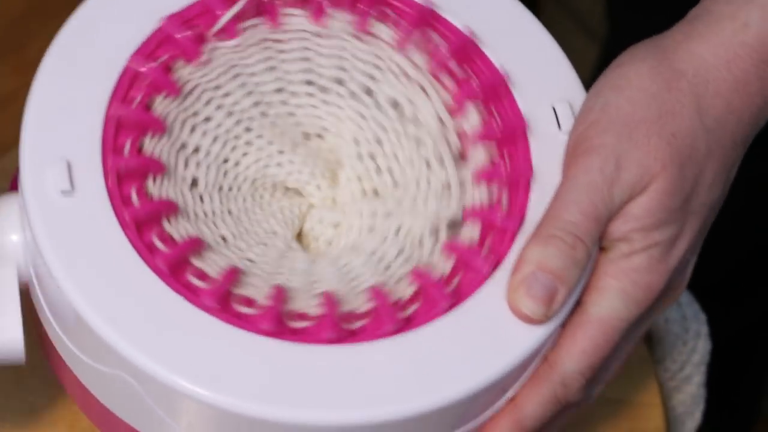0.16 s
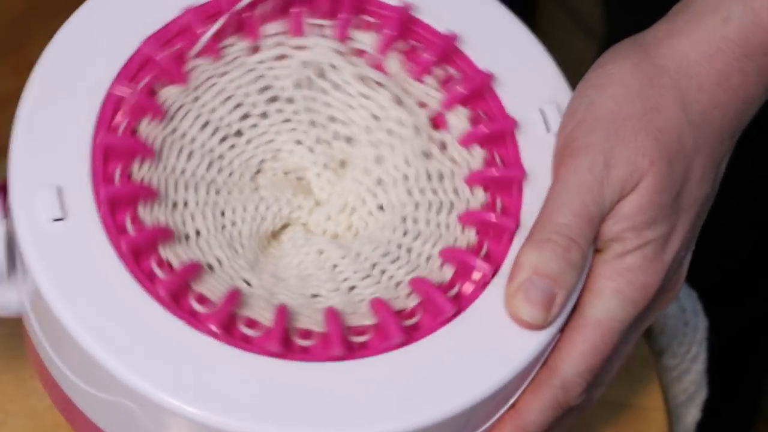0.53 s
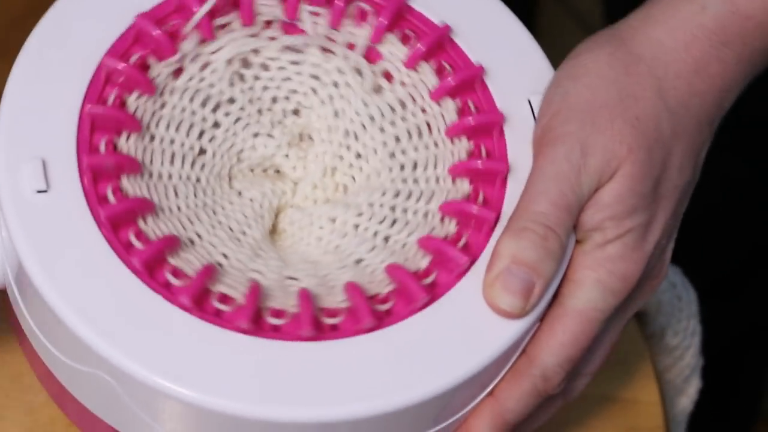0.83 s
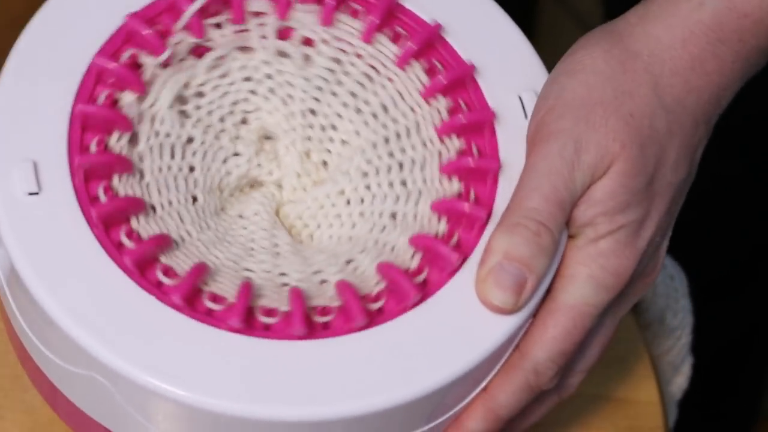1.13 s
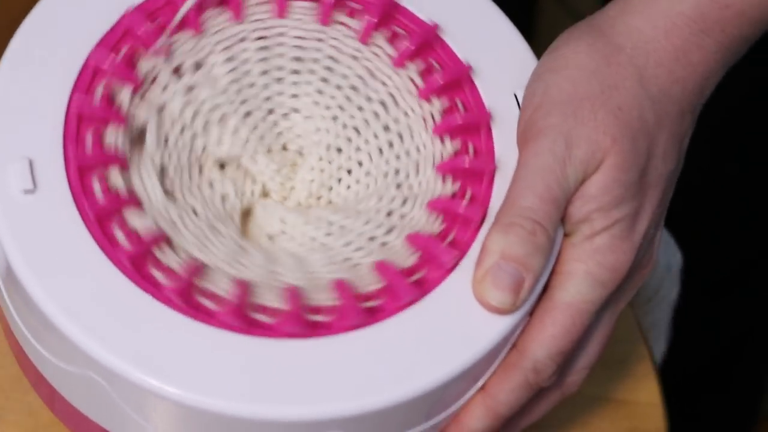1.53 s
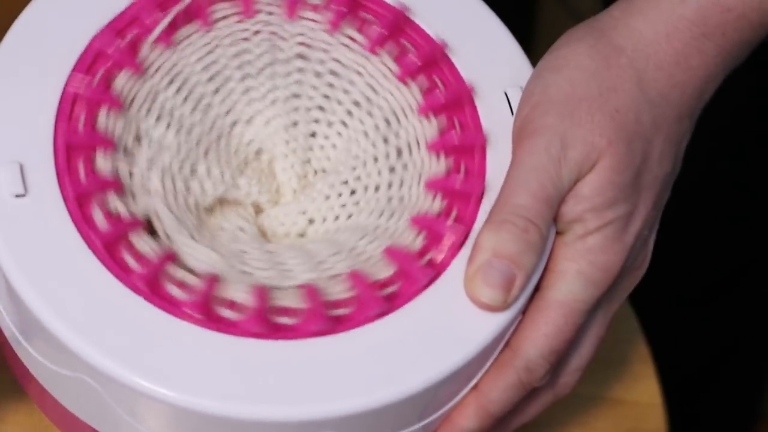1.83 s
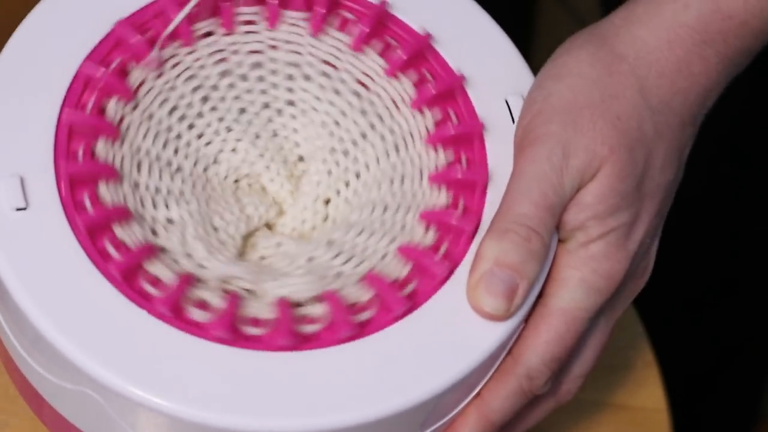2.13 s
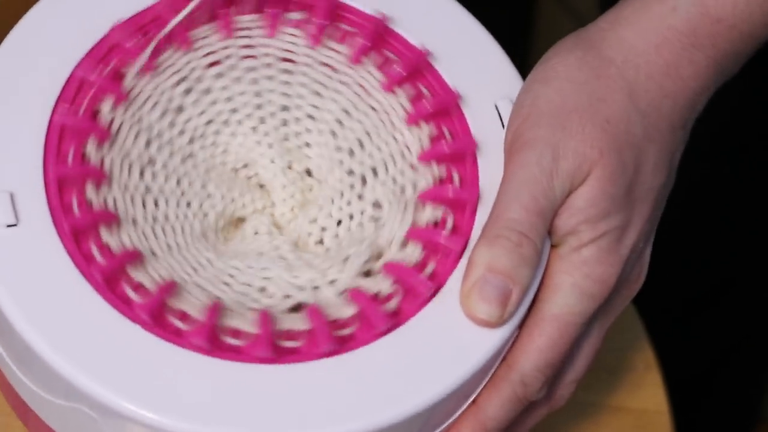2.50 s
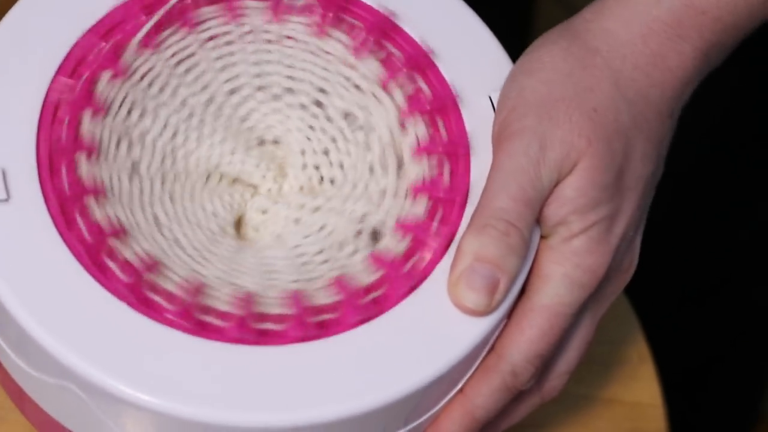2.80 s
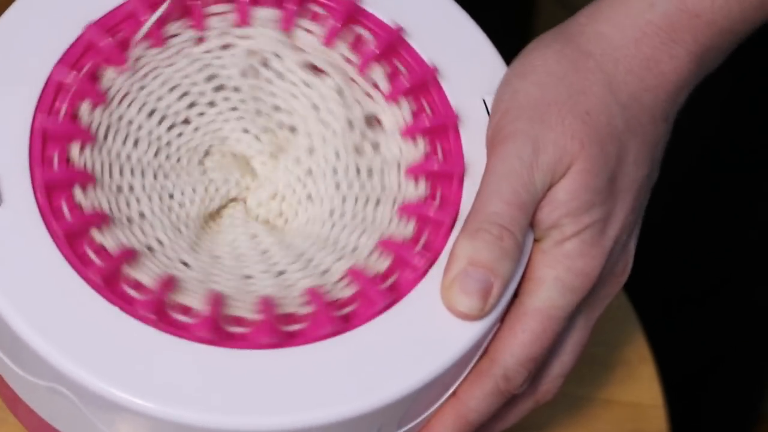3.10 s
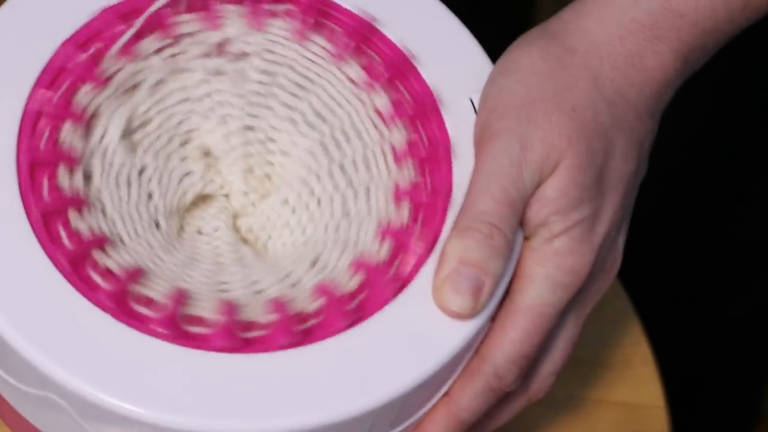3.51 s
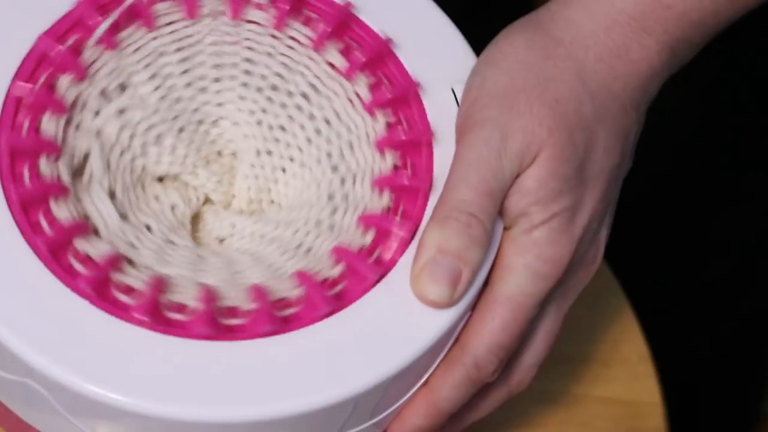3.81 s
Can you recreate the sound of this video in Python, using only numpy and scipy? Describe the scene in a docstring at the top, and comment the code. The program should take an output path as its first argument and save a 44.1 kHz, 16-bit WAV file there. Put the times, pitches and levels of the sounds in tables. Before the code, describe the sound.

Needles of a plastic knitting machine snap and chatter in short bright clicks over surging gear rattle as a hand turns the crank, continuing to the end; recorded very close in a quiet small room.

```python
"""A burst of rattle comes first, then needles snap over the cam in short chattering clicks.
It is a plastic hand-cranked circular knitting machine, heard close by in a small room.
Each snap is a quick run of tiny knocks; gears and needle butts rattle in surges as the hand turns the crank.
Snaps and rattle ring the hollow housing, the needle bed and the needle tips through resonances.
Filtered noise makes the faint rumble of the table and the hush of the room; a short noise tail is the echo."""
import sys
import numpy as np
from scipy import signal
from scipy.fft import rfft, irfft, next_fast_len
from scipy.io import wavfile
from scipy.ndimage import map_coordinates

SR = 44100
rng = np.random.default_rng(int(sys.argv[2]) if len(sys.argv) > 2 else 0)


def file_out(sig):
    """Save sig as 16-bit WAV at sys.argv[1]."""
    # one column per channel
    cols = np.atleast_2d(sig).T
    # limit, then scale
    lim = np.clip(cols, -1, 1)
    pcm = np.round(lim * 32767).astype(np.int16)
    wavfile.write(sys.argv[1], SR, pcm)


N = 174195  # length in samples


def amp(db):
    """Turn decibels into a plain multiplier."""
    return 10 ** (np.asarray(db) / 20)


def unit(x):
    """Scale a sound to an rms of 1."""
    return x / np.sqrt(np.mean(x ** 2) + 1e-20)


def along(points, hz):
    """Read a curve of (f/Hz, value) points, with straight lines on a log frequency axis."""
    f, value = np.transpose(points)
    return np.interp(np.log(hz + 1), np.log(f + 1), value)


def wobble(rate):
    """Draw a smooth random curve through `rate` random points a second."""
    points = rng.standard_normal(int(N * rate / SR) + 4)
    return map_coordinates(points, [np.arange(N) * rate / SR])


def filtered(x, response):
    """Filter a sound by a response given as a function of frequency in Hz."""
    m = next_fast_len(N + SR // 2)  # spare room so that the ringing does not wrap round
    spectrum = rfft(x, m) * response(np.fft.rfftfreq(m, 1 / SR))
    return irfft(spectrum, m)[..., :N]


def high_pass(f, corner_hz):
    """A gentle response that thins out everything below the corner."""
    return 1j * f / (corner_hz + 1j * f)


def resonance(f, center_hz, width_hz):
    """The response of one springy part: strongest at its own pitch, weaker on both sides."""
    drag = 1j * f * width_hz
    return drag / (center_hz ** 2 - f * f + drag)


def taps(s, size):
    """Place single-sample knocks of the given sizes at the given times in seconds."""
    places = np.clip((s * SR).astype(int), 0, N - 1)
    return np.bincount(places.ravel(), size.ravel(), N)


CONTACTS = 40  # tiny knocks in each run
CHATTER_MS, CHATTER_GROWS = 6, .4  # snap length at mean rattle level; dB longer per dB harder cranking
SETTLE_MS, SETTLE_DB = 22, -6.5  # the weak shiver lasts this much longer and has this level beside the snap
TIPS_SETTLE_DB = -7  # the light tips come to rest sooner
BUNCHED = 1.2  # above 1, contacts crowd at the start
FADE_DB, SCATTER_DB = 4.5, 3  # contacts fade over the run and differ at random
RISE_MS = 0.21  # a snap builds up this fast
KNOCK_LOW_HZ = 493  # a snap is too brief to boom the lowest housing modes
# Needle snaps: (t/s, bed energy level/dB, tips level/dB over the bed, housing level/dB over the bed)
NEEDLE_SNAPS = [(0.062, 5.5, -5.5, -4), (0.1341, -11.5, 2, 1), (0.1635, -8, -13, 1), (0.204, 4, -1, 1.5),
                (0.217, 2, -6, 1), (0.2962, 8.5, 0, -6), (0.3483, -9, 1, 5), (0.377, -2.5, -8, -8),
                (0.413, 5.5, -10, -6), (0.4479, -6, 3, -3), (0.4936, 10, -10.5, -2), (0.517, -7, 1.5, 6),
                (0.59, 4, -8.5, 2), (0.618, -11, 1, 13), (0.6769, -4, -5, 3), (0.707, -5.5, -14, 6),
                (0.756, -2, -14, 1), (0.8669, -12, -7, 9), (0.8779, -2.5, -7.5, -5), (0.9535, -1.5, -4, -4),
                (0.9756, 10.5, -11, -8), (1.0753, -14, -6, 3), (1.12, 1.5, -12.5, -1.5),
                (1.142, -0.5, -12.5, -8), (1.247, -17, -26, 17.5), (1.2931, 4, -9, -2),
                (1.3974, 8.5, -13, -0.5), (1.5127, 2, -8.5, 1), (1.5529, 10, -3.5, -4.5),
                (1.695, -8, 3.5, 11), (1.813, 5, -8, -8), (1.8719, 2, -1, 4), (1.9195, 1.5, -9, -9),
                (2.0963, 4.5, -6.5, 3.5), (2.124, 3.5, -8.5, -4), (2.2234, 3.5, -10, 3.5),
                (2.254, 3, -6, -4), (2.288, 4, 0, -3), (2.3167, 5, 0.5, 5), (2.423, 4.5, -10, 4.5),
                (2.4433, 3, -0.5, -1), (2.4967, -1.5, 0.5, -3), (2.5182, 1, -7, 6), (2.5387, 5, -8, 0),
                (2.6307, -0.5, -5, 5), (2.6654, 7.5, -1, -4), (2.7237, 5, -4.5, -3),
                (2.816, 1.5, -6.5, -10), (2.861, 9.5, -9.5, -8), (2.903, 5.5, -7, 3),
                (2.9248, 6.5, -11, -0.5), (3.01, -2.5, 0.5, -3), (3.0559, 0, -4, 8), (3.07, 7, -14, -6),
                (3.1, 0.5, 0.5, 3), (3.21, -2, -8, 2), (3.296, 7, -16, 5.5), (3.336, 1, -19, -4),
                (3.4049, -0.5, 0, 2), (3.4335, 13, -8.5, -13), (3.4732, 3, -6, 5), (3.531, 1, -15, -11),
                (3.5864, -2.5, -11, 9), (3.6134, 3, -7, -11), (3.665, -7.5, 0, 6), (3.7404, 5, -13, -4),
                (3.808, 8.5, -3, -1.5), (3.8641, -0.5, -4, 0.5), (3.9017, 1, -16, -13)]


def snaps():
    """A needle snap is a quick run of fading contacts plus a weak shiver; both knock housing, bed and tips."""
    s, bed_db, tips_over_db, housing_over_db = np.transpose(NEEDLE_SNAPS)[..., None]
    level_db = crank_db()
    harder_db = level_db[(s * SR).astype(int)] - level_db.mean()
    chatter_ms = CHATTER_MS * amp(CHATTER_GROWS * harder_db)
    chatter = (chatter_ms, bed_db, tips_over_db)
    shiver = (chatter_ms + SETTLE_MS, bed_db + SETTLE_DB, tips_over_db + TIPS_SETTLE_DB)
    blows = 0
    for length_ms, run_db, tips_db in (chatter, shiver):
        late = rng.random((len(s), CONTACTS)) ** BUNCHED  # 0 = start of the run, 1 = its end
        late_ms = late * length_ms
        run = []
        for part_db in (housing_over_db, 0, tips_db):
            size = amp(SCATTER_DB * rng.standard_normal(late.shape) - FADE_DB * late)
            size = size * (1 - np.exp(-late_ms / RISE_MS))
            size = amp(run_db + part_db) * size / np.linalg.norm(size, axis=1, keepdims=True)
            # two sets of random signs: one for mid, one for side
            run.append([taps(s + late_ms / 1000, size * rng.choice([-1, 1], late.shape)) for _ in range(2)])
        blows = blows + np.array(run)
    housing, bed, tips = blows
    housing = filtered(housing, lambda f: high_pass(f, KNOCK_LOW_HZ))
    return np.array([housing, bed, tips])


# How loud the rattle is as the hand turns the crank: (t/s, level/dB)
CRANK_LEVEL = [(0.0, -22), (0.109, -35), (0.148, -30), (0.21, -26), (0.351, -31), (0.497, -25.5),
               (0.558, -39.5), (0.606, -27), (0.78, -35), (0.852, -53), (0.972, -32.5), (1.038, -42.5),
               (1.07, -35), (1.14, -36), (1.229, -45), (1.298, -26), (1.39, -31), (1.462, -40.5),
               (1.542, -38.5), (1.569, -29), (1.732, -35.5), (1.868, -25.5), (1.952, -32.5), (2.122, -25.5),
               (2.192, -36), (2.222, -26), (2.324, -22), (2.392, -36.5), (2.43, -23.5), (2.48, -32),
               (2.541, -22.5), (2.6, -40), (2.648, -26), (2.741, -24), (2.799, -30), (2.939, -24),
               (3.022, -34), (3.072, -24.5), (3.148, -26), (3.179, -35), (3.221, -26), (3.303, -25),
               (3.36, -34), (3.42, -23.5), (3.518, -33), (3.658, -23.5), (3.709, -32), (3.798, -25),
               (3.95, -29.5)]


def crank_db():
    """Join the crank points with straight lines to get a rattle level for every sample."""
    return np.interp(np.arange(N) / SR, *np.transpose(CRANK_LEVEL))


RATTLES, TICKS = 3000, 320  # small contacts and ticks in the whole scene
TICK_RANGE_DB = 25.5  # ticks are weaker than the strongest by up to this much
TICK_DIFFER_DB = 10.5  # and by up to this much more, separately in housing, bed and tips
TICK_T60_S = .028  # a flare falls by 60 dB in this time
SLIDE_DB = -7  # smooth rubbing, beside the contacts
GROWS = 1.14  # the tips follow the crank more steeply, dB per dB
# Rattle in housing, bed, tips: (level/dB over the crank level)
RATTLE_OVER_CRANK = [1.5, -2.5, -11]
# Strongest possible tick in housing, bed, tips: (level/dB over the even rattle)
STRONGEST_TICK = [9, 18.5, 19.5]


def rattle():
    """Gears and needle butts make dense contacts that flare in ticks, plus smooth rubbing, as the crank turns."""
    level_db = crank_db()
    mean_db = level_db.mean()
    contact_s = rng.random(RATTLES) * N / SR
    # one tick at a random place in each equal slice of time
    tick_s = (np.arange(TICKS) + rng.random(TICKS)) / TICKS * N / SR
    weaker_db = -TICK_RANGE_DB * rng.random(TICKS)
    t = np.arange(SR // 10) / SR
    decay = amp(-60 * t / TICK_T60_S)
    parts = []
    for part_db, grows, tick_db in zip(RATTLE_OVER_CRANK, (1, 1, GROWS), STRONGEST_TICK):
        tick_size = amp(weaker_db + tick_db - TICK_DIFFER_DB * rng.random(TICKS))
        flare = 1 + signal.fftconvolve(taps(tick_s, tick_size), decay)[:N]
        contacts = np.array([taps(contact_s, rng.standard_normal(RATTLES)) for _ in range(2)])
        rubbing = amp(SLIDE_DB) * rng.standard_normal((2, N))
        gain = amp(part_db + mean_db + grows * (level_db - mean_db))
        parts.append(gain * (unit(flare * contacts) + rubbing))
    return np.array(parts)


COLOUR_DB, COLOUR_PER_S = 2.5, 60  # strength wobble of each mode, and its random points a second


def ring(x, modes):
    """A struck part rings at several pitches, each with its own changing strength."""
    out = 0
    for k, (center_hz, width_hz, db) in enumerate(modes):
        struck = x * amp(db + COLOUR_DB * wobble(COLOUR_PER_S))
        # every other mode is turned upside down
        out = out + filtered(struck, lambda f: (-1) ** k * resonance(f, center_hz, width_hz))
    power = sum(amp(2 * db) * width_hz * np.pi / SR for center_hz, width_hz, db in modes)
    return out / np.sqrt(power)


HOUSING_LOW_HZ = 301  # the small shell hardly radiates below
# Ringing of the hollow housing: (f/Hz, width f/Hz, level/dB)
HOUSING_MODES = [(387.3, 35.8, 4), (496, 64, -1), (665, 161, -6), (1018.4, 72, -5), (1220, 125, -3.5),
                 (1366, 96, 0), (1484, 396, -8)]
# Ringing of the needle bed: (f/Hz, width f/Hz, level/dB)
BED_MODES = [(1998, 340, -3), (2480, 660, -2.5), (3115, 302, 4), (3800, 1570, -6.5), (4770, 1710, -11)]
# Ringing of the needle tips: (f/Hz, width f/Hz, level/dB)
TIP_MODES = [(6000, 1320, 0.5), (7750, 290, 1), (8540, 460, -1), (11300, 1400, -6.5), (12360, 1470, -10.5)]
# Balance of housing, bed, tips: (level/dB of left over right)
PART_BALANCE = [-1, -3.5, -3.5]
# What the two microphones hear unlike: (f/Hz, level/dB)
STEREO_DIFFERENCE = [(400, -23.5), (1300, -11), (7000, -6.5), (13000, 0.5)]


def machine(blows):
    """Housing, bed and tips ring under their blows, and the small shell sends out little bass."""
    near = 0
    for x, modes, pan_db in zip(blows, (HOUSING_MODES, BED_MODES, TIP_MODES), PART_BALANCE):
        mid, side = ring(x, modes)
        side = filtered(side, lambda f: amp(along(STEREO_DIFFERENCE, f)))
        balance = amp([[pan_db / 2], [-pan_db / 2]])
        near = near + np.array([mid + side, mid - side]) * balance
    return filtered(near, lambda f: high_pass(f, HOUSING_LOW_HZ) ** 2)


RUMBLE_DB, RUMBLE_GROWS = -47.5, 1  # level at mean cranking; dB louder per dB harder cranking
RUMBLE_SIDE_DB = -19  # side noise beside mid noise
THUD_HZ, THUD_WIDTH_HZ, THUD_DB = 120, 35, -2  # housing knocks thump the table top
# Tone of the table rumble: (f/Hz, level/dB per Hz)
RUMBLE_TONE = [(20, -30), (62, -18.5), (100, -5), (260, -8), (500, -20.5)]


def table(knocks):
    """The table top rumbles under the machine as it is cranked and thumps under its knocks."""
    level_db = crank_db()
    rumble_db = RUMBLE_DB + RUMBLE_GROWS * (level_db - level_db.mean())
    rumble = amp(rumble_db) * noise(RUMBLE_TONE, RUMBLE_SIDE_DB)
    thud = filtered(knocks, lambda f: resonance(f, THUD_HZ, THUD_WIDTH_HZ) ** 2)
    return rumble + amp(THUD_DB) * thud


ROOM_T60_S = 0.072  # time for the tail to fall by 60 dB
# Tone of the echo: (f/Hz, level/dB beside the direct sound)
ROOM_TONE = [(300, -19), (12000, -4)]


def room(x):
    """Nearby surfaces and walls return a short fading echo, unlike in the two channels."""
    t = np.arange(SR // 4) / SR
    tail = rng.standard_normal((2, SR // 4)) * amp(-60 * t / ROOM_T60_S)
    tail = tail / np.linalg.norm(tail[0])
    delayed = np.pad(x, (40, 0))  # samples before the first echo
    wet = signal.fftconvolve(delayed[None], tail, axes=1)[:, :N]
    return filtered(wet, lambda f: amp(along(ROOM_TONE, f)))


AIR_DB, AIR_SIDE_DB = -45, -11  # level of the hush; its side noise beside mid noise
# Tone of the room hush: (f/Hz, level/dB per Hz)
AIR_TONE = [(440, -4), (5000, -19)]


def hush():
    """The quiet room is a steady soft noise."""
    return amp(AIR_DB) * noise(AIR_TONE, AIR_SIDE_DB)


def noise(spectrum, side_db):
    """Shape random noise into a stereo sound with an rms of 1."""
    mid, side = filtered(rng.standard_normal((2, N)), lambda f: amp(along(spectrum, f)))
    side = amp(side_db) * side
    return unit(np.array([mid + side, mid - side]))


def scene():
    """Snaps and rattle ring the machine, and table, echo and hush lie around it."""
    snap_blows = snaps()
    near = machine(snap_blows + rattle())
    housing_knocks = snap_blows[0, 0]  # the mid channel
    return near + room(near.mean(0)) + table(housing_knocks) + hush()


DULL_HZ = 12200  # the microphone falls away above
CEILING = .99  # peaks bend smoothly towards this limit
TOP_HZ = 15800  # nothing is kept from here up


def record(dry):
    """The microphone dulls the treble, the input stage rounds off the highest peaks, and the band is limited."""
    dull = filtered(dry, lambda f: 1 / (1 + 1j * (f / DULL_HZ) ** 3))
    soft = dull / (1 + abs(dull / CEILING) ** 4) ** (1 / 4)
    return filtered(soft, lambda f: f < TOP_HZ)


dry = scene()
out = record(dry)
file_out(out)
```